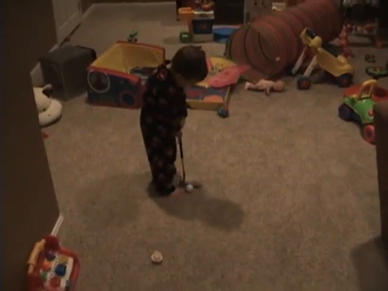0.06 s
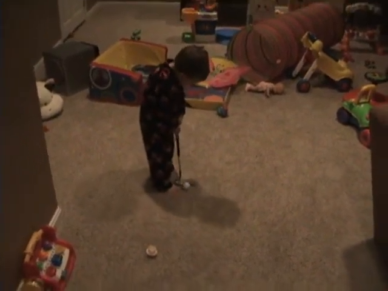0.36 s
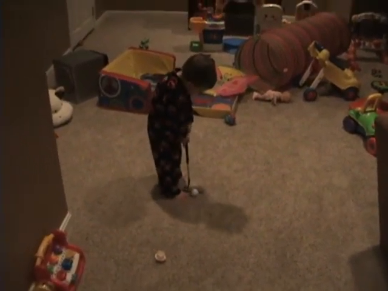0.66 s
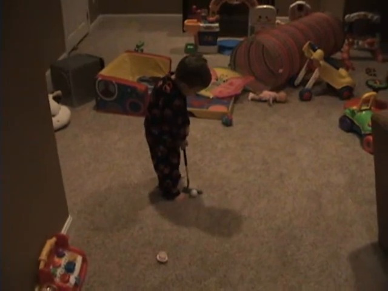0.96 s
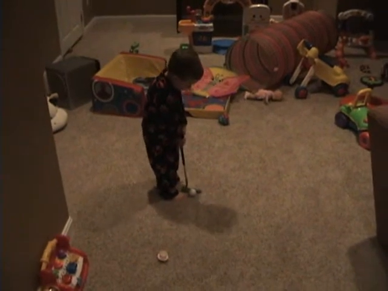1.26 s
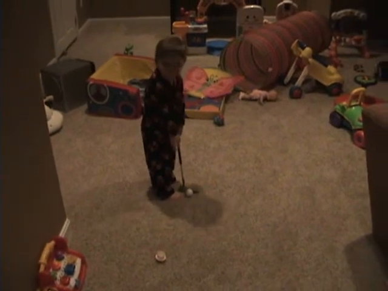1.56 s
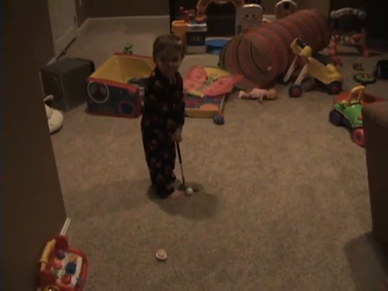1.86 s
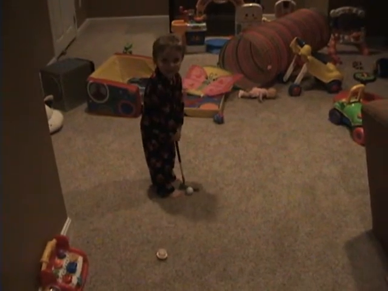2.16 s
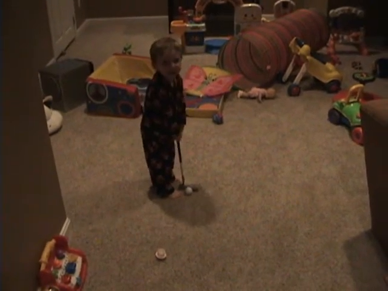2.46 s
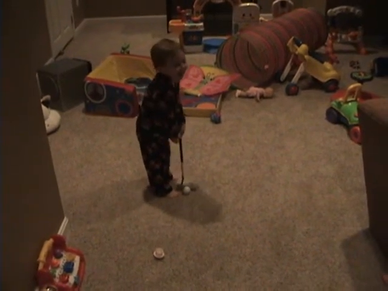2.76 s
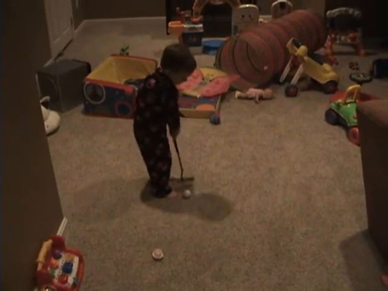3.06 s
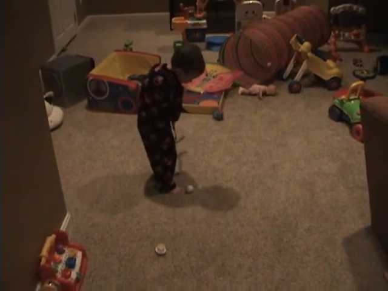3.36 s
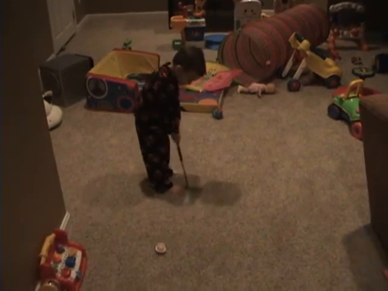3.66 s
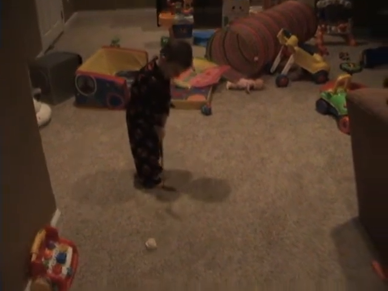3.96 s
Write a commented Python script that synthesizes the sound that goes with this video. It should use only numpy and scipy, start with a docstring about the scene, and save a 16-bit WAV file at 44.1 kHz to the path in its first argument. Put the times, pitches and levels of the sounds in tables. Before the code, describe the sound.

A putter clicks once against a ball in a quiet, faintly humming room.

```python
"""A quiet playroom: an appliance hums and a hand-held camera's drive whines thinly over soft hiss.
Faint handling ticks and rustles come in the first 1.5 s; at 2.9 s a last rustle, and a whirr joins.
At 3.74 s a putter clicks once against a ball on the carpet. The steel head rings on faintly;
ceiling and walls answer with early echoes and a short diffuse tail."""
import sys
import numpy as np
from scipy import signal
from scipy.fft import rfft, irfft, next_fast_len
from scipy.io import wavfile
from scipy.ndimage import map_coordinates

SR = 44100
rng = np.random.default_rng(int(sys.argv[2]) if len(sys.argv) > 2 else 0)


def waveform_to_disk(signal):
    """Save audio, clipped to [-1, 1], as 16-bit WAV at the path in sys.argv[1]."""
    frames = np.transpose(np.atleast_2d(signal))
    scaled = np.clip(frames, -1, 1) * 32767
    samples = np.round(scaled).astype(np.int16)
    wavfile.write(sys.argv[1], SR, samples)


N = 176400
TIME_S = np.arange(N) / SR

# Appliance motor fundamental: time_s, level_db
DEEP_HUM_LEVEL = [(0, -60), (.5, -59), (1.15, -58), (1.8, -61), (2.4, -63), (3.0, -61.5), (3.6, -59),
                  (4, -58.5)]
# Appliance motor tones: pitch_hz, level_db, pan_db
HUM_TONES = [(158.7, -63.5, -1.5), (168.2, -68, 0), (176, -70.5, -4), (231, -68.5, -0.5), (316, -75.5, -2),
             (385, -69.5, -3), (477.3, -67, -4), (506, -72, 1), (584, -72, 2), (601, -67, 5),
             (630.4, -54.5, -2), (657.7, -62, 6), (796, -69.5, -9), (1020, -70, -6), (1773, -77, -12)]
# Motor speed drift: time_s, speed_ratio
HUM_SPEED = [(0, .9995), (1.5, 1.0), (2.6, 1.0035), (4, 1.003)]
# Shared level drift of the motor tones: time_s, gain_db
HUM_GAIN = [(0, 0), (.4, 0), (1.7, 0), (2.2, -1.5), (3.1, -1.5), (3.6, -2.5), (4, -1)]
# Camera drive tones: pitch_hz, level_db
WHINE_TONES = [(2380, -84.5), (5990, -85), (6293, -93), (6595, -86.5), (6955, -83.5), (7052, -88),
               (7149, -81), (9528, -89.5), (12750, -91)]
# Air and hiss spectrum: freq_hz, gain_db
AIR_SPECTRUM = [(22, -4), (40, -4), (90, -7), (170, -0.5), (280, -3.5), (450, -0.5), (650, -1), (880, -4.5),
                (1030, 0), (1130, -7.5), (1300, -1), (1550, -7.5), (2400, -13), (4000, -17.5), (5600, -18),
                (7000, -16), (8000, -22), (10500, -23.5), (12000, -28), (15500, -28)]
# Air level drift: time_s, gain_db
AIR_GAIN = [(0, 2), (.25, 2.5), (.6, 1.2), (1.45, 1), (2, 1.16), (3.6, 1), (4, 2)]
# Air stereo likeness: freq_hz, correlation
AIR_CORRELATION = [(60, 0.23), (130, 0.45), (290, -0.068), (640, 0.78), (1410, -0.25), (3100, -0.11),
                   (6820, 0.037), (15000, 0.41)]
# Air stereo balance: freq_hz, pan_db
AIR_PAN = [(100, 0), (1300, -0.5), (4400, -2.5), (8000, -5), (15000, 0.5)]
# Rubs of hands and clothes: peak_s, level_db, centre_hz, half_width_s, q
RUSTLES = [(0.26, -60, 2180, 0.15, 1.3), (0.474, -59, 706, 0.055, 1.6), (1.342, -59, 385, .025, 3.6),
           (1.42, -64, 1210, 0.096, 6.7), (2.883, -64, 3170, .035, 21)]
# Handling ticks: start_s, level_db, centre_hz, t60_s
TICKS = [(0.2869, -39.5, 1010, 0.021), (0.2885, -36, 2220, 0.019), (0.4693, -37.5, 1410, 0.011),
         (0.475, -43, 330, 0.057), (1.3927, -44.5, 1150, 0.027), (1.459, -47.5, 1290, .04)]
# Ceiling, wall and furniture echoes: delay_s, gain_db, cutoff_hz, left_lag_s
ECHOES = [(.004, -6.5, 4500, .00001), (.0098, -37, 1530, -.0001), (0.0126, -14.5, 9000, .0001),
          (0.0195, -31, 6000, -.0002), (0.0233, -18, 3500, .0001), (.0262, -20.5, 9000, -.0001),
          (.0322, -25, 1500, .0002), (.0395, -21, 5000, -.0002), (0.0448, -40, 1800, .0001)]
# Room tail decay: freq_hz, t60_s
ROOM_T60 = [(150, 0.48), (400, 0.27), (1000, 0.4), (3500, 0.38), (8000, 0.23), (15000, 0.33)]
# Room tail colour: freq_hz, gain_db
ROOM_SPECTRUM = [(100, -18.5), (200, -11), (350, -3), (600, -4.5), (950, -14.5), (1400, -6), (2200, -13.5),
                 (3300, -13.5), (5000, -5), (6500, -12), (9000, -7), (15000, -13.5)]
# Room tail stereo likeness: freq_hz, correlation
ROOM_CORRELATION = [(150, 1), (600, 0.84), (1400, 1), (3000, 0.23), (15000, 1)]
# Faint whirr tones: pitch_hz, level_db
WHIRR_TONES = [(2052, -79.5), (2502, -75), (2922, -79)]
# Ball and putter head modes: pitch_hz, level_db, t60_s, pan_db
PUTT_MODES = [(255, -34, 0.031, 2), (430, -42, 0.028, -1), (960, -6.5, 0.009, -2.5),
              (1612, -25.5, 0.016, -1), (2410, -21, 0.011, -2), (2880, -25, 0.03, 2),
              (3230, -16.5, 0.015, 5), (3420, -46, 0.3, 0), (3650, -42, .016, 2), (4720, -48.5, .28, 2),
              (4910, -24, 0.012, 11), (5200, -56, 0.23, 1), (6280, -26.5, .011, 14),
              (7200, -22, 0.0062, -3)]
# Contact noise spectrum: freq_hz, gain_db
CRACK_SPECTRUM = [(300, -12), (2000, 10.5), (4000, 7.5), (7000, 2.5), (10000, -4), (12500, -3.5),
                  (15000, -1), (16500, -7)]


def amp(db):
    """Decibels to gain."""
    return 10 ** (np.asarray(db) / 20)


def unit_rms(x):
    """Scale to rms 1."""
    return x / np.sqrt(np.mean(x ** 2) + 1e-20)


def pan(db):
    """Stereo gains, left over right by db."""
    return amp(np.array([[.5], [-.5]]) * db)


def at_freq(points, hz):
    """Interpolate on a log frequency axis."""
    freqs_hz, values = np.transpose(points)
    return np.interp(np.log(hz + 1), np.log(freqs_hz + 1), values)


def curve(points):
    """Interpolate over time, per sample."""
    return np.interp(TIME_S, *np.transpose(points))


def wobble(knots_per_s):
    """Smooth random curve."""
    return map_coordinates(rng.standard_normal(512), [TIME_S * knots_per_s], mode="wrap")


def decay(start_s, t60_s):
    """Step up, then exponential fall."""
    age_s = TIME_S - start_s
    return (age_s >= 0) * np.exp(-np.log(1000) * np.maximum(age_s, 0) / t60_s)


def filtered(x, response):
    """Apply a complex frequency response."""
    size = next_fast_len(N + SR // 2)
    return irfft(rfft(x, size) * response(np.fft.rfftfreq(size, 1 / SR)), size)[..., :N]


def stereo_noise(correlation):
    """White noise with left-right correlation set per frequency."""
    def mid_side_gains(hz):
        angle = np.arccos(np.clip(at_freq(correlation, hz), -1, 1)) / 2
        return np.array([np.cos(angle), np.sin(angle)])
    mid, side = filtered(rng.standard_normal((2, N)), mid_side_gains)
    return np.array([mid + side, mid - side])


def band_noise(centre_hz, q, cutoff_hz=7000):
    """Stereo noise in one resonance, treble softened, rms 1."""
    def response(hz):
        resonance = 1j * hz / (centre_hz ** 2 - hz ** 2 + 1j * hz * centre_hz / q)
        return resonance / (1 + 1j * hz / cutoff_hz)
    return unit_rms(filtered(stereo_noise([(1000, .66)]), response))


def wavering_tones(tones, flutter_db, drift_rad):
    """Sines with random level and phase wobble."""
    total = 0
    for hz, db in tones:
        gain = np.sqrt(2) * amp(db + flutter_db * wobble(11))
        total += gain * np.sin(2 * np.pi * hz * TIME_S + drift_rad * wobble(40))
    return total


def deep_hum(pitch_hz=59, octave_db=-10):
    """Appliance motor turning near mains rate, plus its octave."""
    phase = 2 * np.pi * pitch_hz * TIME_S
    return np.sqrt(2) * amp(curve(DEEP_HUM_LEVEL)) * (np.sin(phase) + amp(octave_db) * np.sin(2 * phase))


def motor_hum(flutter_db=.43, drift_rad=.19, left_lag_s=.00006):
    """Motor tones drift together with speed; close neighbours beat."""
    motor_time_s = np.cumsum(curve(HUM_SPEED)) / SR + np.array([[-.5], [.5]]) * left_lag_s
    tones = 0
    for hz, db, pan_db in HUM_TONES:
        gain = pan(pan_db) * amp(db + flutter_db * wobble(5.16))
        phase = 2 * np.pi * (hz * motor_time_s + rng.random()) + drift_rad * wobble(3.91)
        tones += gain * np.sin(phase)
    return np.sqrt(2) * amp(curve(HUM_GAIN)) * tones


def drive_whine(pan_db=-20.5):
    """Thin tones of the camera drive, far to the right."""
    return pan(pan_db) * wavering_tones(WHINE_TONES, flutter_db=2, drift_rad=.4)


def air(base_db=-53, flutter_db=.85, top_hz=15800):
    """Soft room air and microphone hiss."""
    def response(hz):
        return (hz < top_hz) * amp(at_freq(AIR_SPECTRUM, hz)) * pan(at_freq(AIR_PAN, hz))
    noise = unit_rms(filtered(stereo_noise(AIR_CORRELATION), response))
    return amp(base_db + curve(AIR_GAIN) + flutter_db * wobble(10)) * noise


def rustles():
    """Hands and clothes rub: band noise swells and fades."""
    return sum(amp(db) * np.exp(-((TIME_S - peak_s) / half_width_s) ** 2) * band_noise(hz, q)
               for peak_s, db, hz, half_width_s, q in RUSTLES)


def ticks(q=4.2):
    """Handling ticks: resonant noise bursts that die at once."""
    return sum(amp(db) * decay(start_s, t60_s) * band_noise(hz, q) for start_s, db, hz, t60_s in TICKS)


def early_echoes(x):
    """Distinct reflections, each dulled by its surface."""
    def response(hz):
        total = 0
        for delay_s, db, cutoff_hz, left_lag_s in ECHOES:
            arrival_s = delay_s + np.array([[.5], [-.5]]) * left_lag_s
            total += amp(db) * np.exp(-2j * np.pi * hz * arrival_s) / (1 + 1j * hz / cutoff_hz)
        return total
    return filtered(x, response)


def room_tail(x, build_s=.018):
    """Diffuse sound builds up, then each frequency dies at its own rate."""
    hz, frame_s, spectra = signal.stft(stereo_noise(ROOM_CORRELATION)[:, :SR // 2], SR, nperseg=256)
    fade = np.exp(-np.log(1000) * frame_s / at_freq(ROOM_T60, hz)[:, None])
    tail = signal.istft(spectra * fade, SR, nperseg=256)[1]
    tail *= 1 - np.exp(-(TIME_S[:tail.shape[1]] / build_s) ** 2)
    tail /= np.linalg.norm(tail[0])
    wet = signal.fftconvolve(x.mean(0)[None], tail, axes=1)[:, :N]
    return filtered(wet, lambda hz: amp(at_freq(ROOM_SPECTRUM, hz)))


def whirr(start_s=2.9, beat_hz=28.6):
    """Faint flutter: each tone beats with a slightly higher twin."""
    twins = [(hz + beat_hz, db) for hz, db in WHIRR_TONES]
    return (TIME_S > start_s) * wavering_tones(WHIRR_TONES + twins, flutter_db=1.5, drift_rad=.5)


def putt(start_s=3.7412, rise_s=.00006, crack_db=-21.5, low_cut_hz=177):
    """One hard contact: the ball clacks with a bright crack, the steel head rings on."""
    age_s = np.maximum(TIME_S - start_s, 0)
    ring = -sum(pan(pan_db) * amp(db) * decay(start_s, t60_s) * np.sin(2 * np.pi * hz * age_s)
                for hz, db, t60_s, pan_db in PUTT_MODES)
    noise = filtered(stereo_noise([(1000, .7)]), lambda hz: amp(at_freq(CRACK_SPECTRUM, hz)))
    crack = pan(db=2) * amp(crack_db) * unit_rms(noise) * decay(start_s, t60_s=.024)
    impact = (1 - np.exp(-age_s / rise_s)) * (ring + crack)
    # Bass below about 177 Hz is cut from the contact.
    return filtered(impact, lambda hz: -hz ** 2 / (low_cut_hz ** 2 - hz ** 2 + 1j * hz * low_cut_hz))


def scene(handling_send_db=1.5):
    """Handling noises and putt in the room, over hum, whine and hiss."""
    click = putt()
    handling = ticks() + rustles()
    direct = handling + click
    background = deep_hum() + motor_hum() + whirr() + drive_whine() + air()
    tail = room_tail(click + amp(handling_send_db) * handling)
    return background + direct + early_echoes(direct) + tail


def record(dry, top_hz=16300, edge_hz=200):
    """Camera band limit: a steep low-pass."""
    return filtered(dry, lambda hz: np.clip((top_hz - hz) / edge_hz + .5, 0, 1))


dry = scene()
out = record(dry)
waveform_to_disk(out)
```